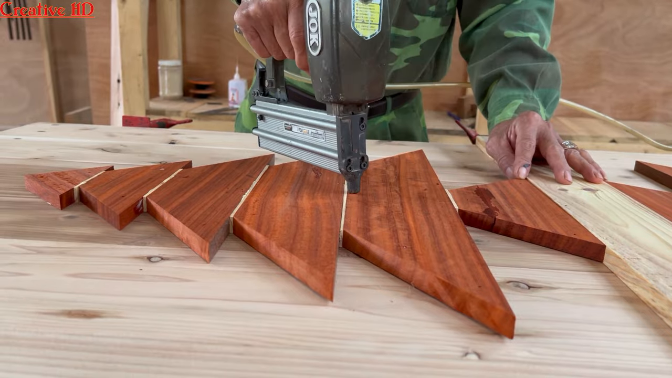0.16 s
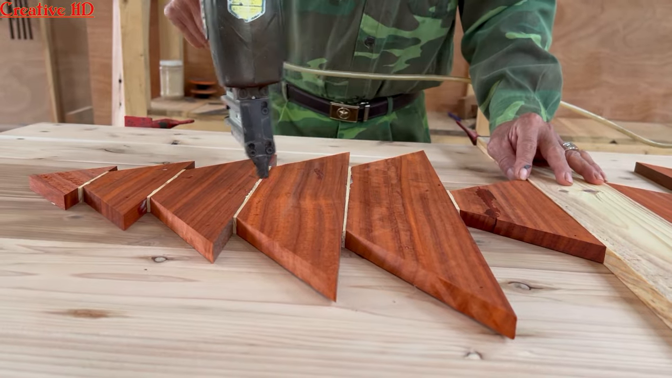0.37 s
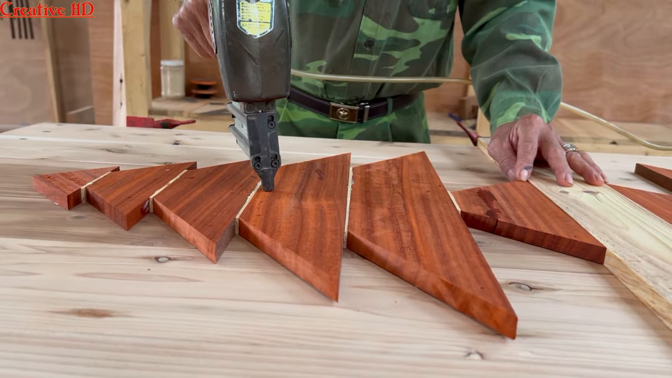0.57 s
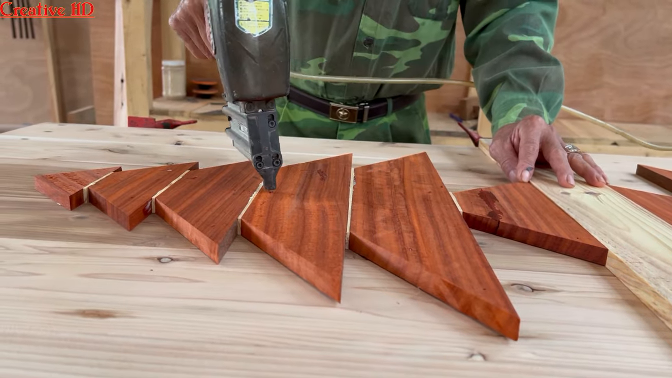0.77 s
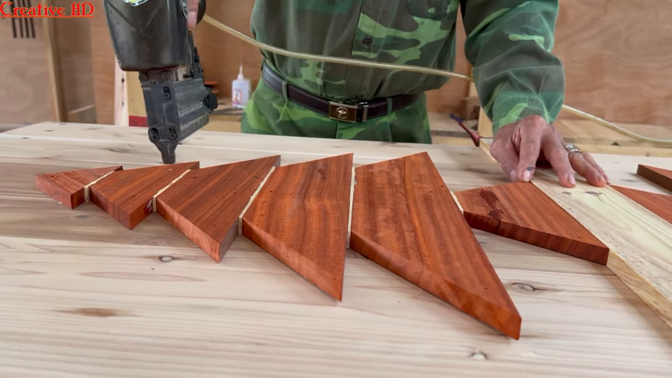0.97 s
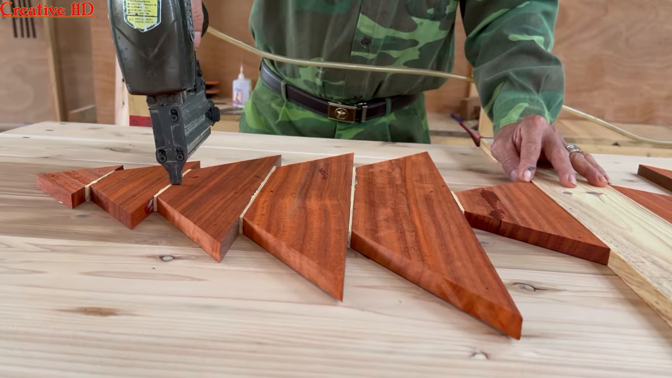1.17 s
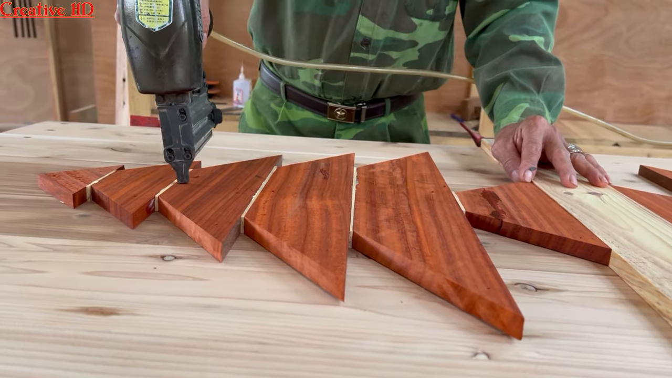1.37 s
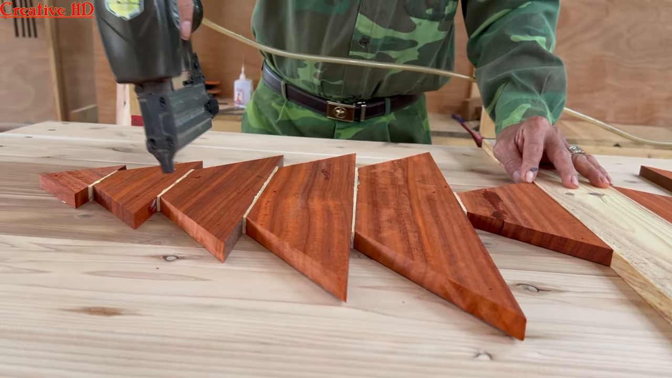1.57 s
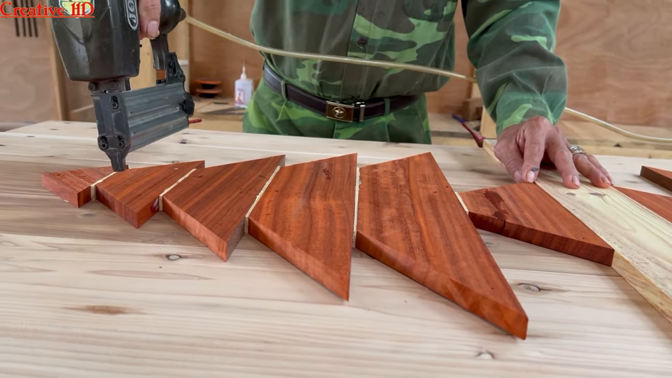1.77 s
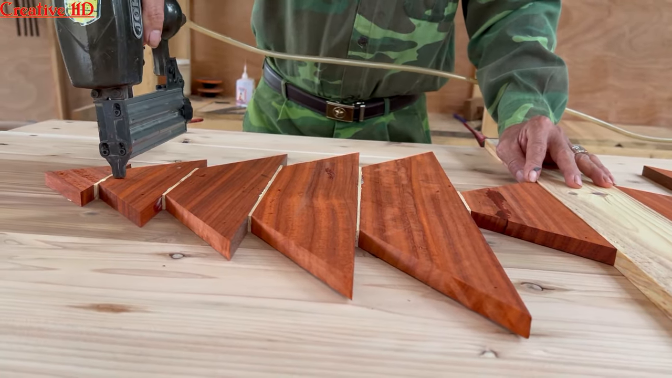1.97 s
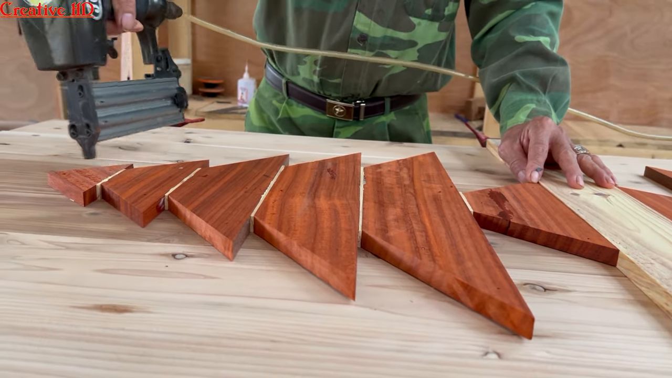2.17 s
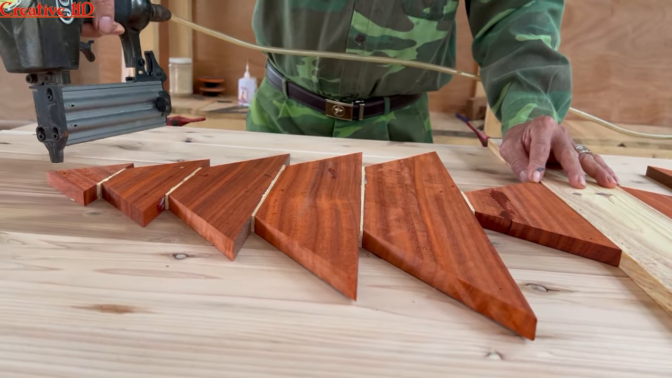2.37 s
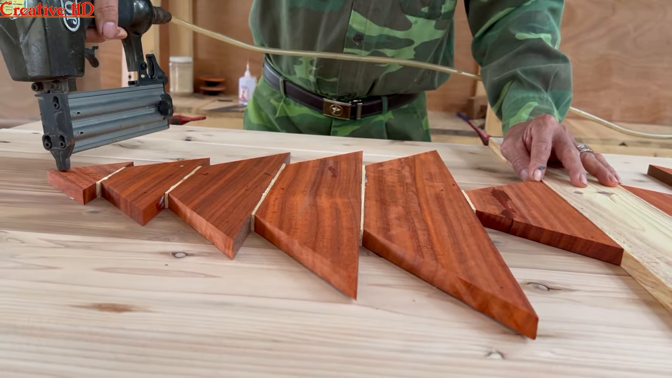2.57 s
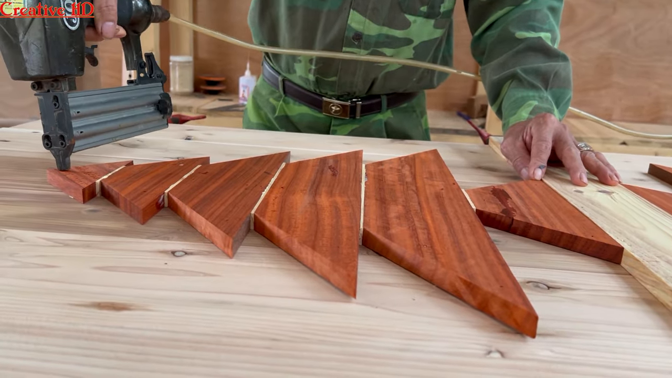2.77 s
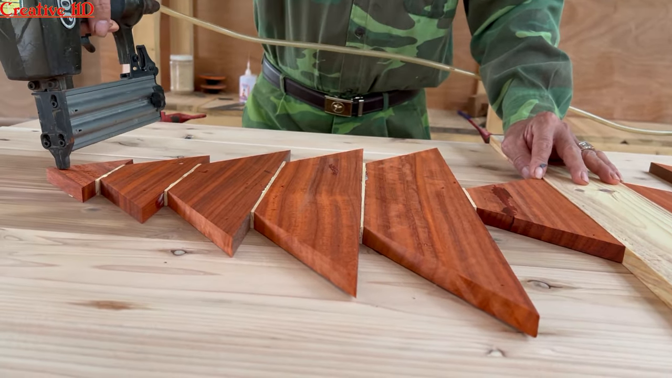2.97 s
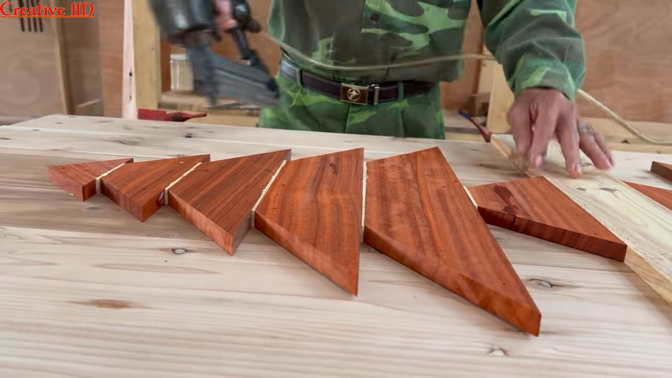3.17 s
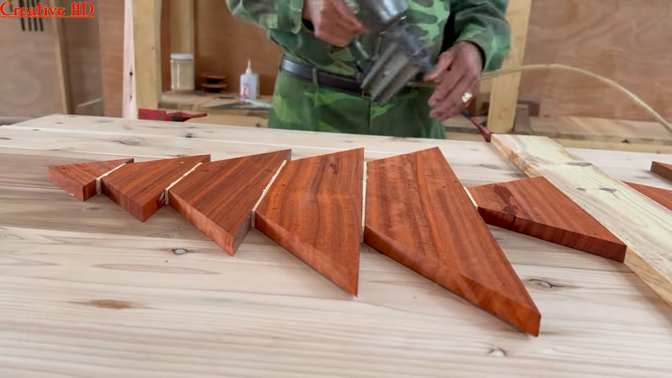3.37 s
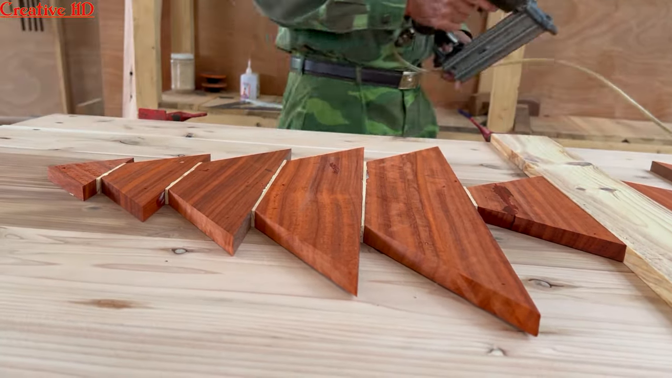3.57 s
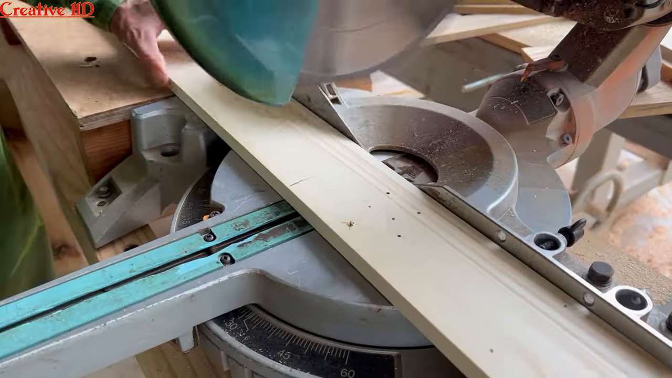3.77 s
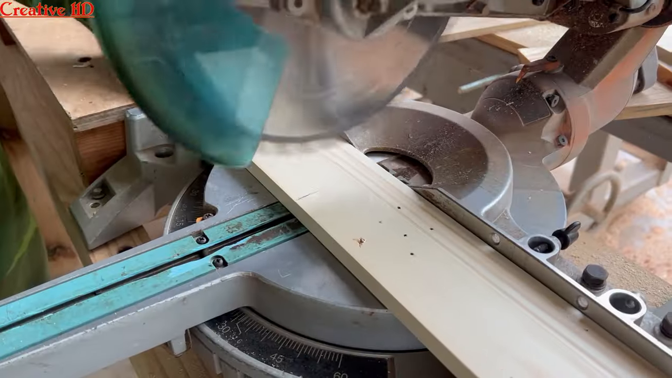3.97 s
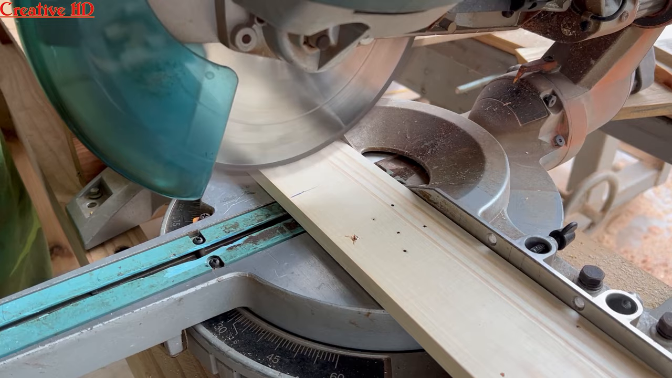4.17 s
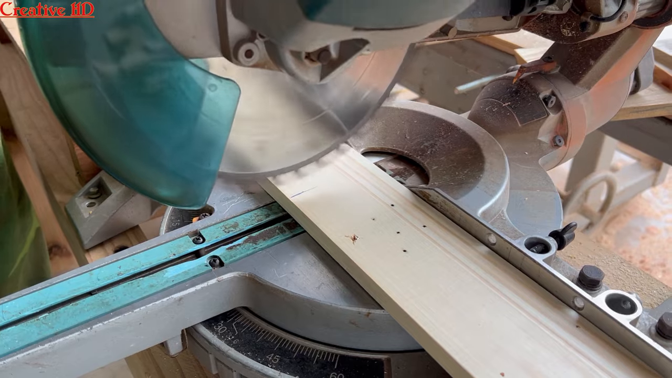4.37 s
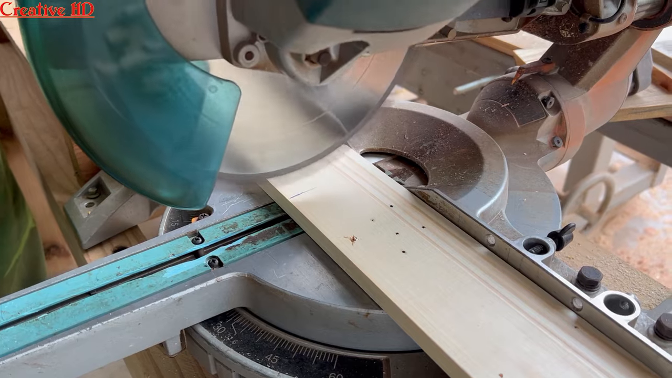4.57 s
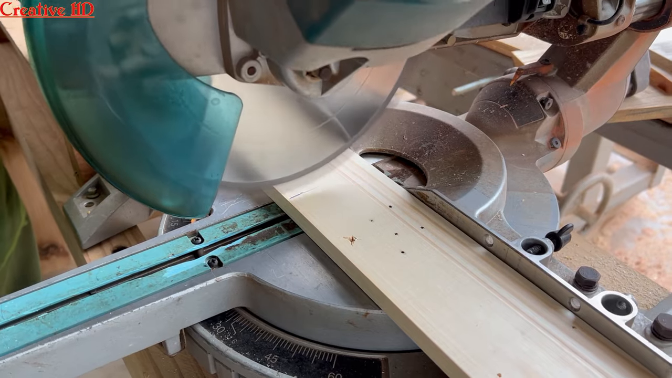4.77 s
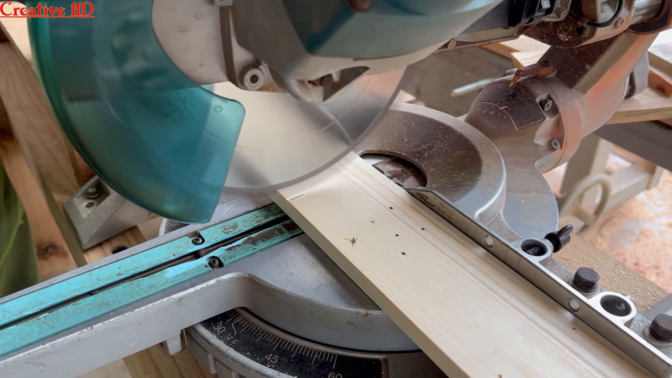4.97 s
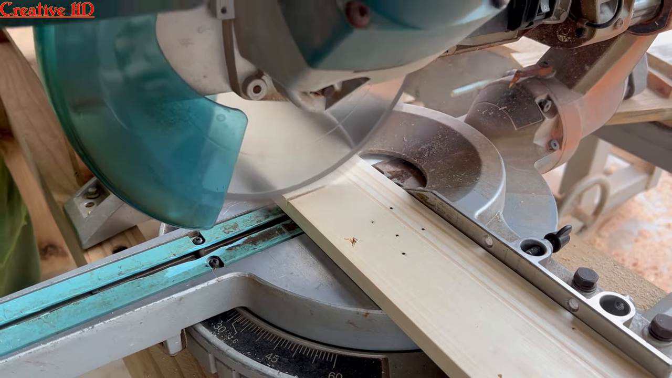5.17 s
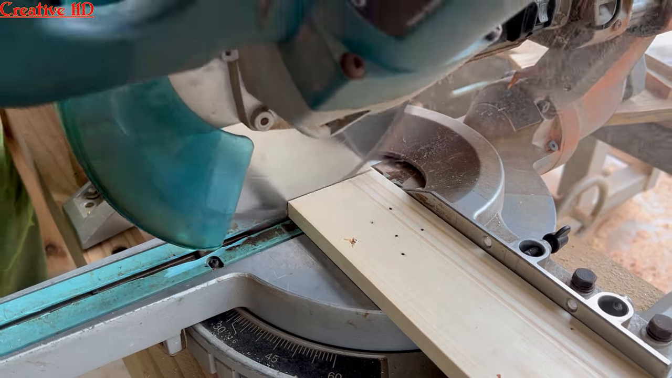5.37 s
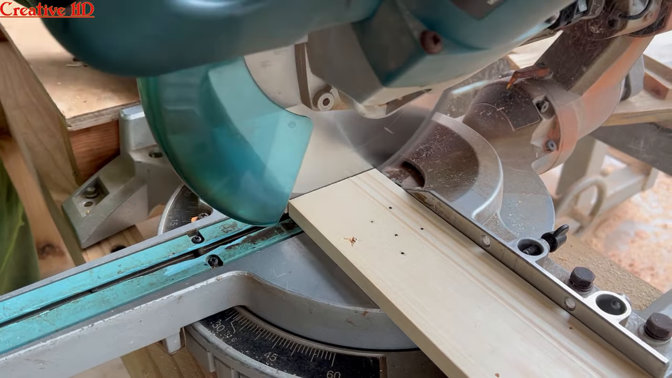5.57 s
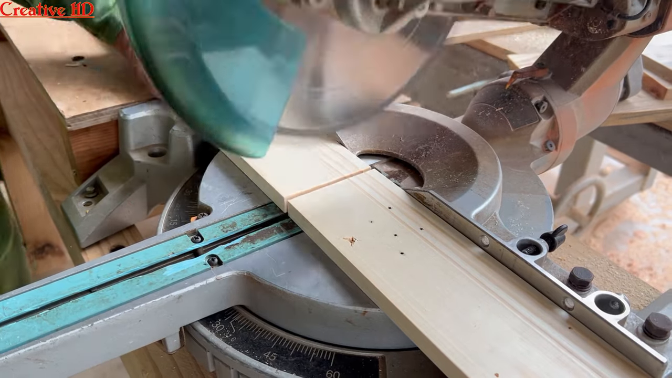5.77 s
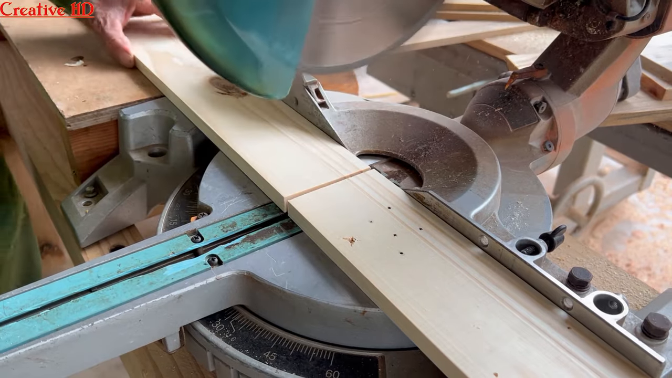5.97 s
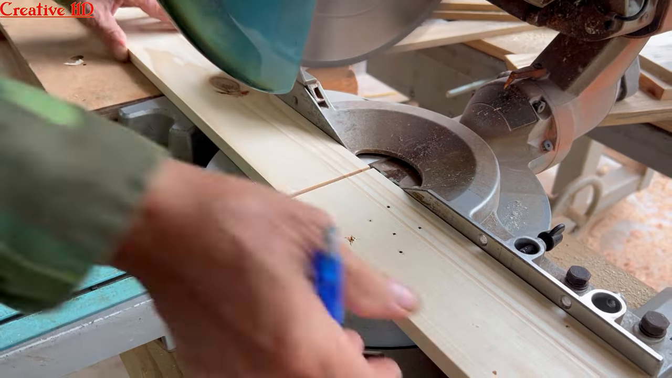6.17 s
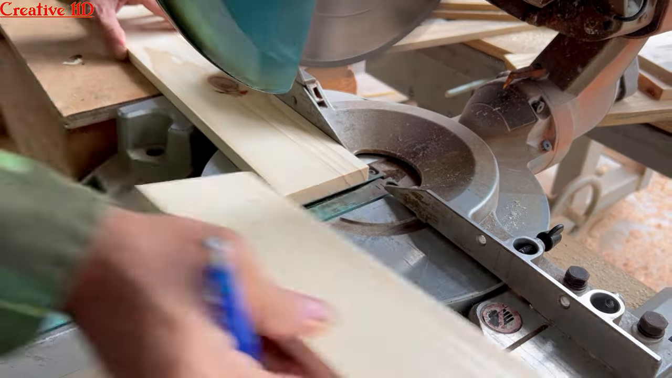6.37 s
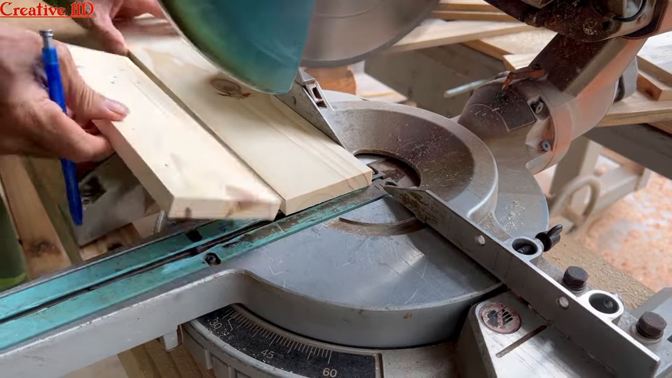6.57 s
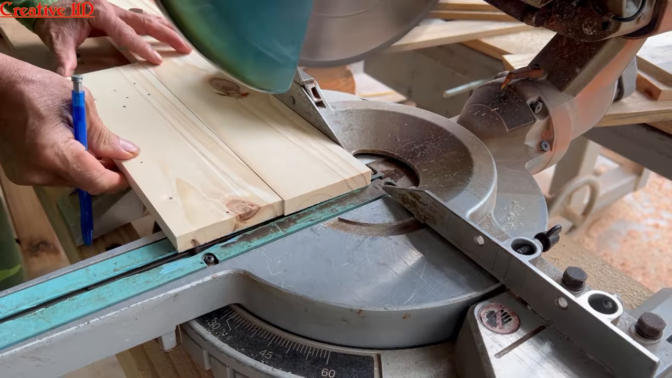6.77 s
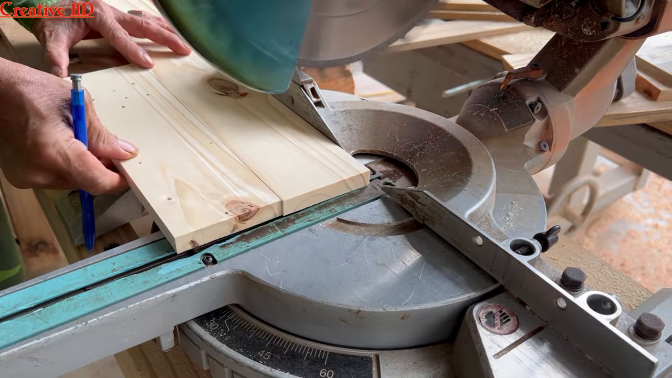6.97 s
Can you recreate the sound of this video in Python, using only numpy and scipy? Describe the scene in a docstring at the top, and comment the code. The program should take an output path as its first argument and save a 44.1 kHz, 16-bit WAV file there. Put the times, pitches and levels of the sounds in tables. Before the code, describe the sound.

In a quiet workshop, a pneumatic nailer fires five times into wood at an uneven pace, each shot a sharp crack with a puff of air and a thump through the bench. Light taps fall between the shots. Then a mitre saw jolts on, whines up to speed and roars through a board. It clacks and winds down, and boards knock and slide softly. Everything is heard close up.

```python
"""A pneumatic nailer is set on wood and fired five times. In each shot the valve hisses, the driver
strikes, the piston returns and the gun bounces on the humming bench. Then the blade of a mitre saw is
heard coasting; its motor starts with a jolt and whines up to speed, the teeth roar through a board and
the blade screams in its modes. The brake slows it, and last the boards are knocked and slid along.
Faint workshop noise lies under it all."""
import sys
import numpy as np
from scipy import signal
from scipy.fft import rfft, irfft, next_fast_len
from scipy.io import wavfile
from scipy.ndimage import map_coordinates

SR = 44100
rng = np.random.default_rng(int(sys.argv[2]) if len(sys.argv) > 2 else 0)


def dump(signal):
    """Clip the signal to [-1, 1] and save it as 16-bit WAV at the path in sys.argv[1]."""
    limited = np.clip(np.atleast_2d(signal).T, -1, 1)
    pcm = np.round(limited * 32767).astype(np.int16)
    wavfile.write(sys.argv[1], SR, pcm)


N = 309565

# Nail shots. Each row: times in seconds of valve opening, strike, piston return and nose landing,
# then levels in dB of shot, recoil thump and landing.
SHOTS = [(.2185, .2315, .2930, .412, -13, -16, -18), (.7745, .7925, .8335, .923, -11.5, -14, -24),
         (1.525, 1.540, 1.5945, 1.707, -15, -22, -25), (2.0695, 2.0825, 2.1495, 2.2675, -13, -12, -17),
         (3.019, 3.0375, 3.0995, 3.217, -12, -12.5, -19)]
# Gun set down on the wood. Each row: start in seconds, level in dB, relative click level in dB.
TAPS = [(0.076, -31, -18.5), (0.573, -34, -20), (1.164, -29.5, -9.5), (1.894, -29.5, -18.5),
        (2.565, -49.5, -15), (3.513, -43.5, -7)]
# Gun jolting against the wood. Each row: start in seconds, peak in dB, contact cutoff in Hz.
JOLTS = [(0.391, -25, 256), (0.7773, -17.5, 1030), (2.117, -21.5, 300), (3.021, -23.5, 901)]
# Trigger and safety tip snapping. Each row: start in seconds, level in dB.
TRIGGER_CLICKS = [(.17, -49.5), (0.7767, -27)]
# Catches, motor jolts and knocking boards.
# Each row: start in seconds, level in dB, treble level in dB, pitch of the struck part in Hz.
CLACKS = [(3.753, -35.5, -54, 2100), (3.772, -37, -57, 2680), (4.584, -27, -31.5, 1450),
          (5.805, -17.5, -26, 1405), (6.506, -53, -48, 7500), (6.525, -48, -45.5, 7460),
          (6.542, -46, -51, 3900), (6.638, -33, -44.5, 3390), (6.672, -29, -51, 2700),
          (6.687, -33.5, -60, 1420), (6.731, -35, -48.5, 1290)]
# Modes of struck bodies. Each row: frequency in Hz, relative level in dB, nominal t60 in seconds.
HOUSING_MODES = [(766, 0.5, 0.04)]
BENCH_MODES = [(85.86, -5, 0.55), (103.6, -3, 0.67), (171, -9, .3)]
WOOD_MODES = [(318, -16, 0.16), (437, -8.5, 0.19), (486, -7, 0.11), (747, -11.5, .21)]
# Motor tones. Each row: multiple of the whine's pitch, driven level in dB, braking level in dB,
# ratio of steady core to rasp when driven, share of full speed below which the tone fades.
MOTOR_TONES = [(1 / 8, -14, -28, 3, .8), (1, -5, -7, .35, .1), (2, -.5, 4, .15, .28),
               (3, -2, -16, .15, .55), (4, -12, -10, .15, .12), (8, -40, -18, .1, .06)]
# Blade modes in the cut. Each row: frequency in Hz, width in Hz, level in dB, loudest time in seconds.
CUTTING_MODES = [(4870, 25, -26, 5.28), (5220, 150, -28, 5.4), (5240, 85, -25, 5.6), (6460, 5, -30, 5.375),
                 (7250, 300, -35, 5.72), (8979, 15, -37, 5.39), (9765, 130, -31, 5.42),
                 (10440, 90, -32, 5.34), (11950, 55, -34, 5.46), (12796, 20, -33, 5.41),
                 (14680, 130, -34, 5.27), (15500, 80, -32, 5.39)]
# Modes of the free blade. Each row: frequency in Hz, level before the cut in dB, level after it in dB.
FREE_MODES = [(1903, -65, -55), (2265, -55, -64), (3064, -58, -73), (3920, -61, -55), (4140, -57, -53),
              (6470, -57, -55)]
# Resonances of guard and blade. Each entry: frequency in Hz.
GUARD_HZ = [1330, 1950, 2800, 3680, 4800, 5250, 6600, 7350, 8750, 9750]
# Broad resonances. Each row: frequency in Hz, level in dB.
BOARD_RESONANCES = [(950, -36), (1220, -34.5)]  # the board under the teeth
TABLE_RESONANCES = [(720, -3), (1250, -1.5), (1900, 2), (3100, -1.5)]  # knocked board and saw table
# Spectra. Each row: frequency in Hz, relative spectral level in dB.
STRIKE_SPECTRUM = [(200, -19), (600, -2), (2320, -3.5), (5500, -10.5), (12300, -15), (16000, -23.5)]
AIR_SPECTRUM = [(200, -18), (400, -9), (4300, -10), (7000, -14.5), (12200, -9.5), (16000, -14.5)]
KNOCK_SPECTRUM = [(100, -15.5), (420, 0.5), (800, -9.0), (5000, -47.5)]
CLICK_SPECTRUM = [(1500, 4.5), (3500, -3.0), (8000, -21.5)]
CUT_SPECTRUM = [(50, -34), (380, -18.5), (1080, -0.5), (1850, -7.5), (2750, -5), (5200, -0.5), (8100, -10),
                (10000, -6.5), (16000, -11)]
WHINE_RADIATION = [(300, -9), (1600, 3), (2700, -4), (3600, 1), (8700, -7), (10300, -15)]
SCRAPE_SPECTRUM = [(1500, -7), (5000, 6.0), (15000, -9.5)]
SWISH_SPECTRUM = [(200, -22), (700, -9), (2600, -4.5), (4900, -5.5), (16000, -21)]
RUMBLE_SPECTRUM = [(30, -64), (70, -2.5), (140, 3), (330, -15.5), (1300, -43)]
RUB_SPECTRUM = [(200, -8), (620, 1), (900, -9.5), (8000, -35)]
WORKSHOP_SPECTRUM = [(30, -46), (120, -5), (1180, -19.5), (3000, -23), (7000, -33.5), (14000, -28)]
# Gain laws of the saw's layers. Each law: gain in dB at full speed, dB lost at a tenth of that speed,
# dB gained in the cut, dB lost with the power off.
ROAR_LAW = (-28.5, 33.5, 0.5, 1)
HISS_LAW = (-24, 23.5, 3.5, 3.5)
WHINE_LAW = (-25, 6, -6, 10)
# Direction of the saw. Each row: frequency in Hz, left minus right level in dB.
SAW_PAN = [(200, -1), (1200, -5.5), (2380, -4), (4400, 4), (8100, -7.5), (15000, -8)]
# Stereo coherence. Each row: frequency in Hz, correlation of left and right.
GUN_COHERENCE = [(500, 0.98), (3100, 0.73), (12000, 0.062)]
SAW_COHERENCE = [(100, 1), (2400, 0.77), (4700, -0.23), (7500, 0.65), (15000, 0.35)]
# Decay times of the tail by frequency. Each row: frequency in Hz, t60 in seconds.
TAIL_T60 = [(2800, 0.48), (5000, 0.39), (6800, .22), (9000, 0.34), (15000, 0.5)]

SEAT_S = .0105  # the piston's way back to its seat
REBOUND_S, REBOUND_DB, REBOUND_HZ = .049, -11.5, 200  # gun rocks back: delay, level re recoil, cutoff
COAST_S, ON_S, OFF_S, BRAKE_S = 3.668, 4.578, 5.7, 5.795  # blade heard, power on, power off, brake grips
STALL_S, RUN_UP_S, RUN_DOWN_S = .016, .415, .543  # delay before the rotor moves, time constants
FULL_HZ, SAG = 5330, .04  # whine at full speed, share of speed lost in the cut
BITE_S, BITE_WIDTH_S = 5.18, 0.27  # the teeth bite hardest; time in and out
CUT_S, CUT_WIDTH_S = 5.39, .15  # the blade is deepest in the board; time in and out
BRAKE_GRIP_S, BRAKE_FADE_DB_PER_S = .08, 12  # the braking whine swells, then fades with the torque
SPLIT_BEFORE_HZ, SPLIT_AFTER_HZ, SPLIT_FALL_HZ_PER_S = 38, 68, 30  # beat rate of the free blade's modes
TOP_HZ = 15900  # band limit


def nailer(return_db=-13.5, air_db=-17, strike_db=.4, housing_db=-13):
    """Turbulence and impact: air rushes in, the driver strikes, the piston vents and slams home."""
    valve, strike, back, _, shot_db, thump_db, _ = np.transpose(SHOTS)
    air = bursts(valve, shot_db + air_db, rise=.0013, hold=.033, t60=.25)
    air = air * noise(AIR_SPECTRUM, GUN_COHERENCE)
    chatter = unit(amp(4.3 * wobble(1400)))  # metal parts meet in many tiny contacts
    blow = bursts(strike, shot_db + strike_db, rise=.0001, hold=.003, t60=.013)
    blow = blow * noise(STRIKE_SPECTRUM, GUN_COHERENCE)
    vent = bursts(back, return_db, rise=.00041, hold=.0044, t60=.05)
    seat = bursts(back + SEAT_S, return_db - .4, rise=.00071, hold=.0039, t60=.0079)
    exhaust = np.hypot(vent, seat) * ragged_colour(noise(AIR_SPECTRUM, GUN_COHERENCE))
    snaps = bursts(*np.transpose(TRIGGER_CLICKS), rise=.0001, hold=.001, t60=.009)
    snaps = snaps * noise(STRIKE_SPECTRUM, GUN_COHERENCE)
    housing = np.zeros(N)
    for s, db in zip(np.r_[strike, back + SEAT_S], np.tile(thump_db, 2)):
        add(housing, s, amp(db + housing_db) * ring(HOUSING_MODES, attack=.001, damping=1))
    return housing + chatter * (blow * pan(-.7) + exhaust * pan(-2.7)) + air * pan(-1.3) + snaps


def ragged_colour(x, depth_db=2.5, spacing_hz=170):
    """Spectral ripple: random peaks and dips give the exhaust hiss a ragged, slightly ringing colour."""
    knots = rng.standard_normal(SR // 20)
    ripple = lambda hz: map_coordinates(knots, [hz / spacing_hz], order=2)
    return unit(filtered(x, lambda hz: amp(depth_db * hz / (hz + 1500) * ripple(hz))))


def bench():
    """Plate vibration: every blow bends the top, which hums until the landing nose damps it."""
    track = np.zeros(N)
    for s, db, cutoff_hz in JOLTS:
        add(track, s, amp(db) * bending_wave(cutoff_hz))
    for _, strike, back, land, _, thump_db, land_db in SHOTS:
        add(track, strike + .0014, amp(thump_db) * bending_wave(cutoff_hz=875))
        add(track, back + .001, amp(thump_db - 2) * bending_wave(cutoff_hz=905))
        add(track, back + REBOUND_S, amp(thump_db + REBOUND_DB) * bending_wave(REBOUND_HZ))
        add(track, land, amp(land_db) * bending_wave(cutoff_hz=1080))
        hum = ring(BENCH_MODES, attack=.066, damping=.94)
        pressed = np.clip((back + np.arange(len(hum)) / SR - land) / .018, 0, 1)
        add(track, back, amp(land_db - 9 - 18 * pressed) * hum)
    return np.roll(track, -(SR // 250))  # advance by the chirps' 4 ms lead-in


def bending_wave(cutoff_hz, spread_s=.0039, lead_s=.0044, low_hz=100):
    """Dispersion: high bending waves travel faster, so a blow arrives as a falling chirp."""
    hz = np.fft.rfftfreq(8192, 1 / SR) + 1
    khz = hz / 1000
    group_delay = spread_s / np.sqrt(khz) - lead_s
    phase = 2 * np.pi * np.cumsum(group_delay) * (hz[1] - hz[0])
    rolloff = khz ** .99 * (1 + (low_hz / hz) ** 4) * (1 + (hz / cutoff_hz) ** 6)
    chirp = np.roll(irfft(np.exp(-1j * phase) / rolloff), SR // 250)  # 4 ms for the fastest waves
    return chirp[:len(chirp) // 2] / np.abs(chirp).max()


def workpiece():
    """Impact excitation: the wood rings when the nose is set down and when a nail goes in."""
    modes = np.zeros(N)
    for s, db, _ in TAPS:
        add(modes, s, amp(db - 3) * ring(WOOD_MODES, attack=.0012, damping=1.1))
    for _, strike, *_ in SHOTS:
        add(modes, strike, amp(-21.5) * ring(WOOD_MODES, attack=.00072, damping=2))
    s, db, click_db = np.transpose(TAPS)
    knock = bursts(s, db - 12, rise=.0011, hold=.0044, t60=.29) * noise(KNOCK_SPECTRUM, GUN_COHERENCE)
    click = bursts(s, db + click_db + 2, rise=.00035, hold=.00089, t60=.014)
    return modes + knock + click * noise(CLICK_SPECTRUM, GUN_COHERENCE)


def saw(inrush_db=-34.5, lifted_db=-2):
    """Flow and cutting noise: teeth and fan roar with speed, joined by motor whine and blade scream."""
    t = clock()
    speed, load, power = motor_state()
    rush = noise(CUT_SPECTRUM, SAW_COHERENCE)
    low = filtered(rush, lambda hz: 1 / (1 + (hz / 2700) ** 6))
    top = filtered(rush, lambda hz: 1 - 1 / (1 + (hz / 7500) ** 4))
    inrush = amp(inrush_db) * (t > ON_S) * power * (1 - speed)  # growl of the starting current
    roar = np.hypot(layer_gain(ROAR_LAW), inrush) * unit(low)
    dulling = .35 * (1 - speed) - .26 * load + .13 * (1 - power)  # a slow blade hisses less brightly
    treble = (rush - low - dulling * top) / np.std(rush - low)
    hiss = np.hypot(layer_gain(HISS_LAW), amp(-11) * inrush) * treble
    hiss *= amp(lifted_db * np.clip((t - BRAKE_S) / .054, 0, 1))  # the teeth lift clear of the kerf
    board = swell(BITE_S, BITE_WIDTH_S) * tones(BOARD_RESONANCES, width_hz=146)[0]
    chips = amp(.94 * wobble(45) + .51 * wobble(600))  # uneven bites of the teeth
    teeth = (roar + board + guard(hiss, depth_db=4.5, width_hz=103)) * chips
    motor = motor_whine()
    return teeth + motor + amp(-17) * reverb(motor) + blade_scream()


def motor_whine():
    """Rotational tones: each glides with the rotor's speed, a steady core within a rasping skirt."""
    speed, _, power = motor_state()
    pitch = FULL_HZ * speed
    cycles = np.cumsum(pitch) / SR
    braked = np.maximum(clock() - BRAKE_S, 0)
    brake = np.sqrt(np.minimum(braked / BRAKE_GRIP_S, 1)) * amp(-BRAKE_FADE_DB_PER_S * braked)
    whine = np.zeros((2, N))
    for multiple, driven_db, braking_db, steady, fade_speed in MOTOR_TONES:
        rasp_rate = 560 * min(multiple, np.sqrt(multiple), 1.5)
        skirt = np.array([wobble(rasp_rate) + 1j * wobble(rasp_rate) for ear in range(2)])
        core = np.exp(1j * rng.random((2, 1))) * amp(3.5 * wobble(60))
        driven = power * amp(driven_db) * (steady * core + skirt)
        braking = brake * amp(braking_db) * (1.15 * core + .55 * skirt)
        tone = np.real((driven + braking) * np.exp(2j * np.pi * multiple * cycles))
        hz = multiple * pitch
        spinning = speed ** 3 / (speed ** 3 + fade_speed ** 3)  # a slow rotor hardly whines
        whine += amp(along(WHINE_RADIATION, hz)) * spinning * (hz < TOP_HZ) * tone
    return guard(whine * layer_gain(WHINE_LAW), depth_db=8, width_hz=130)


def motor_state():
    """Inertia: the motor runs up, sags in the cut and is braked. Gives speed, load and power, 0-1."""
    t = clock()
    load = swell(CUT_S, CUT_WIDTH_S)
    run_up = np.tanh(np.maximum(t - ON_S - STALL_S, 0) / RUN_UP_S)
    run_down = (1 + np.maximum(t - BRAKE_S, 0) / RUN_DOWN_S) ** -4
    power = np.clip((OFF_S - t) / .04 + .5, 0, 1)
    return run_up * (1 - SAG * load) * run_down, load, power


def layer_gain(law):
    """Power law: a saw layer's gain grows with speed and shifts with load and switch-off."""
    full_db, slow_db, cut_db, off_db = law
    speed, load, power = motor_state()
    return amp(full_db + slow_db * np.log10(speed + 1e-9) + cut_db * load - off_db * (1 - power))


def guard(x, depth_db, width_hz):
    """Resonant filtering: the guard favours its own frequencies, so gliding tones swell and fade."""
    peak = lambda hz, f: 1 / (1 + ((hz - f) / (width_hz * np.sqrt(f / GUARD_HZ[0]))) ** 2)
    nearness = lambda hz: np.max([peak(hz, f) for f in GUARD_HZ], axis=0)
    return filtered(x, lambda hz: amp(depth_db * (nearness(hz) - .5)))


def blade_scream(swell_s=.125):
    """Forced vibration: the teeth excite one blade mode after another, which swells and lets go."""
    return sum(swell(s, swell_s) * tones([(hz, db)], width) for hz, width, db, s in CUTTING_MODES)


def clacks(part_db=-7, part_t60=.042):
    """Impact sound: each knock has a wooden body, a bright scrape and the ring of the struck part."""
    s, db, treble_db, pitch = np.transpose(CLACKS)
    body = bursts(s, db - 9, rise=.0004, hold=.003, t60=.05)
    body = body * unit(tones(TABLE_RESONANCES, width_hz=300))
    scrape = bursts(s, treble_db + 3.5, rise=.00039, hold=.0018, t60=.03)
    scrape = scrape * noise(SCRAPE_SPECTRUM, SAW_COHERENCE)
    part = np.zeros(N)
    for start, level_db, hz in zip(s, db, pitch):
        cluster = [(hz * ratio, 0, part_t60) for ratio in (.92, .97, 1, 1.06)]
        add(part, start, amp(level_db + part_db) * ring(cluster, attack=.00046, damping=.95))
    return body + scrape + part


def coasting(before_fade_db_per_s=13, after_fade_db_per_s=5):
    """Free rotation: the blade swishes and sings before and after the cut, over rumble and stand hum."""
    t = clock()
    speed, _, power = motor_state()
    started = np.maximum.accumulate(speed)
    before = (t > COAST_S) * (1 - started)
    after = (1 - power) * amp(-after_fade_db_per_s * (t - BRAKE_S))
    flutter = amp(.9 * wobble(110))
    air = noise(SWISH_SPECTRUM, SAW_COHERENCE) * flutter
    fizz = filtered(air, lambda hz: 1 - 1 / (1 + (hz / 7000) ** 4))  # fades first as the blade slows
    slowed = np.clip((t - COAST_S) / 1.6, 0, 1)
    swish = (air - slowed * fizz) * before * amp(-53 - before_fade_db_per_s * (t - COAST_S))
    swish += air * after * amp(-54.5)
    rumble_db = -60.5 + 5.9 * started + 3.8 * speed
    rumble = (t > COAST_S) * amp(rumble_db) * noise(RUMBLE_SPECTRUM, SAW_COHERENCE)
    driven_hum = power * tones([(200, -54)], width_hz=14)
    free_hum = (1 - power) * after ** 2 * tones([(160, -46)], width_hz=13)
    return swish + blade_singing(before, 1 - power) + speed ** .3 * (driven_hum + free_hum) + rumble


def blade_singing(before, after, backward=.55, t60_cycles=11000, fade_db_per_s=14):
    """Mode splitting: spin parts each mode into a forward and a backward wave that beat ever slower."""
    t, song = clock(), np.zeros((2, N))
    coasted, braked = np.maximum(t - COAST_S, 0), np.maximum(t - BRAKE_S, 0)
    tail = after * amp(-fade_db_per_s * braked)
    split_hz = np.where(t < CUT_S, SPLIT_BEFORE_HZ - SPLIT_FALL_HZ_PER_S * coasted,
                        SPLIT_AFTER_HZ - SPLIT_FALL_HZ_PER_S * braked)
    spin = np.pi * np.cumsum(split_hz) / SR
    knots = np.arange(0, t[-1], 1 / 50)
    for hz, before_db, after_db in FREE_MODES:
        drift = np.cumsum(rng.normal(0, .5, (2, len(knots))), axis=1)
        phase = 2 * np.pi * hz * t + np.array([np.interp(t, knots, ear) for ear in drift])
        turn = spin + np.pi * rng.random()
        pair = np.sin(phase + turn) + backward * np.sin(phase - turn)
        early = before * amp(before_db - 60 * coasted * hz / t60_cycles)  # high modes die first
        song += (early + tail * amp(after_db)) * pair
    return song * np.sqrt(2 / (1 + backward ** 2))


def board_slide(start_s=6.66, level_db=-60.5):
    """Sliding friction: the board rubs unevenly over the saw table."""
    return (clock() > start_s) * amp(level_db + 1.6 * wobble(90)) * noise(RUB_SPECTRUM, SAW_COHERENCE)


def reverb(x):
    """Convolution with a decaying noise tail, which dies fastest near 7 kHz."""
    hz, t, spectra = signal.stft(rng.standard_normal((2, SR * 3 // 4)), SR, nperseg=256)
    tail = signal.istft(spectra * amp(-60 * t / along(TAIL_T60, hz)[:, None]), SR, nperseg=256)[1]
    return signal.fftconvolve(x, tail / np.linalg.norm(tail[0]), axes=1)[:, :N]


def workshop_noise():
    """Ambient noise: a faint floor whose level drifts slowly."""
    return amp(-65.5 + 1.2 * wobble(1.6)) * noise(WORKSHOP_SPECTRUM, GUN_COHERENCE)


def ring(modes, attack, damping):
    """Modal decay: damped sines of random strength and phase, peak 1; damping divides each t60."""
    t = np.arange(SR // 2) / SR
    x = np.zeros(len(t))
    for hz, db, t60 in modes:
        decay = amp(db + rng.normal(0, 3.5) - 60 * damping * t / t60)
        x += decay * np.sin(2 * np.pi * (hz * t + rng.random()))
    x *= 1 - np.exp(-t / attack)
    return x / np.abs(x).max()


def tones(lines, width_hz):
    """Noise-driven resonance: narrow bands that waver independently at the two ears."""
    power = lambda hz: sum(amp(2 * db) / (1 + ((hz - f) / width_hz) ** 2) ** 2 for f, db in lines)
    bands = filtered(rng.standard_normal((2, N)), lambda hz: np.sqrt(power(hz)))
    return unit(bands) * np.sqrt(sum(amp(2 * db) for _, db in lines))


def bursts(times, levels_db, rise, hold, t60):
    """Incoherent addition: envelopes that rise, hold and die away are summed in power."""
    power, t = np.zeros(N), np.arange(SR // 2) / SR
    shape = (1 - np.exp(-t / rise)) * amp(-60 * np.maximum(t - hold, 0) / t60)
    for s, db in np.broadcast(times, levels_db):
        add(power, s, (amp(db) * shape) ** 2)
    return np.sqrt(power)


def noise(spectrum, coherence):
    """Partial coherence: mid and side noise mix into coloured stereo noise of rms 1."""
    def response(hz):
        angle = np.arccos(np.clip(along(coherence, hz), -1, 1)) / 2
        return amp(along(spectrum, hz)) * np.array([np.cos(angle), np.sin(angle)])
    mid, side = filtered(rng.standard_normal((2, N)), response)
    return unit(np.array([mid + side, mid - side]))


def filtered(x, response):
    """Linear filtering: the spectrum of x is multiplied by a frequency response."""
    size = x.shape[-1]
    padded = next_fast_len(size + 8192)
    return irfft(rfft(x, padded) * response(np.fft.rfftfreq(padded, 1 / SR)), padded)[..., :size]


def wobble(rate):
    """Random modulation: a smooth curve with rate knots a second."""
    return map_coordinates(rng.standard_normal(int(N * rate / SR) + 4), [clock() * rate], order=2)


def swell(peak_s, width_s):
    """Gaussian envelope of peak 1."""
    return np.exp(-((clock() - peak_s) / width_s) ** 2)


def along(points, hz):
    """Interpolation of (Hz, value) points on a logarithmic frequency axis."""
    f, values = np.transpose(points)
    return np.interp(np.log(hz + 1), np.log(f + 1), values)


def pan(db):
    """Interaural level difference as left and right gains."""
    return amp(np.array([np.atleast_1d(db), -np.atleast_1d(db)]) / 2)


def add(track, s, sound):
    """Superposition of a sound on a track, starting at s seconds."""
    part = track[round(s * SR):][:len(sound)]
    part += sound[:len(part)]


def amp(db):
    """Amplitude ratio of a level in decibels."""
    return 10 ** (np.asarray(db) / 20)


def unit(x):
    """Normalisation to rms 1."""
    return x / np.sqrt(np.mean(x ** 2) + 1e-20)


def clock():
    """Time of each sample in seconds."""
    return np.arange(N) / SR


def scene():
    """Superposition of direct and reverberant sound: the nailer, then the saw, in one workshop."""
    gun, wood = nailer(), workpiece()
    nailing = gun + amp(-13.5) * reverb(gun) + wood + amp(-12) * reverb(wood) + bench()
    knocks = clacks()
    sawing = saw() + coasting() + board_slide() + knocks + amp(-9) * reverb(knocks)
    sawing = filtered(sawing, lambda hz: pan(along(SAW_PAN, hz)))
    return nailing + sawing + workshop_noise()


def record(dry, skew_rad=.15, low_hz=32):
    """Transduction: two microphones differ in bass phase; peaks are rounded and the band is limited."""
    phase = lambda hz: np.array([[-skew_rad], [skew_rad]]) / (1 + (hz / 500) ** 2)
    x = filtered(dry, lambda hz: np.exp(1j * phase(hz)) * hz ** 2 / (hz ** 2 + low_hz ** 2))
    rounded = x / (1 + np.abs(x / .85) ** 6) ** (1 / 6)
    return filtered(rounded, lambda hz: 1 / (1 + (hz / TOP_HZ) ** 160))


dry = scene()
out = record(dry)
dump(out)
```